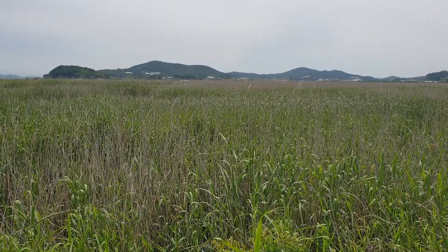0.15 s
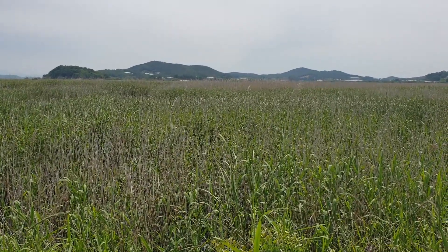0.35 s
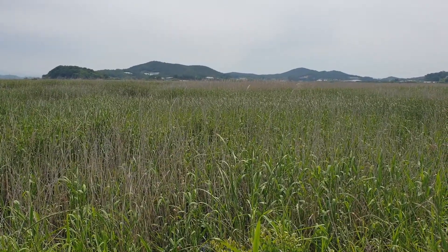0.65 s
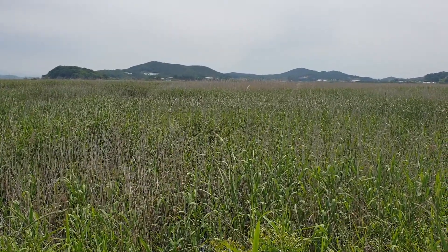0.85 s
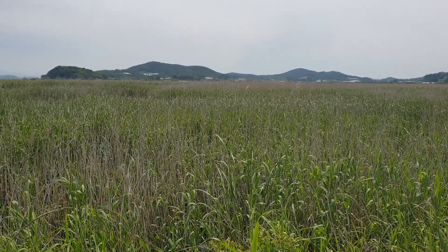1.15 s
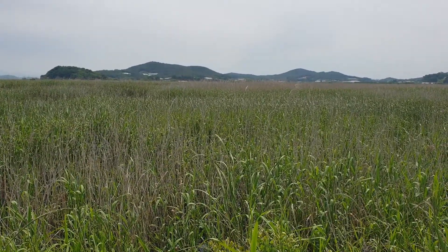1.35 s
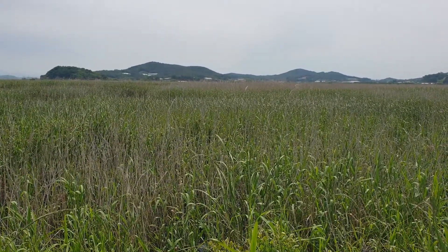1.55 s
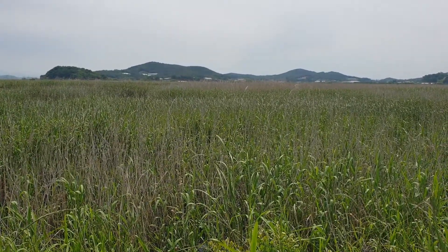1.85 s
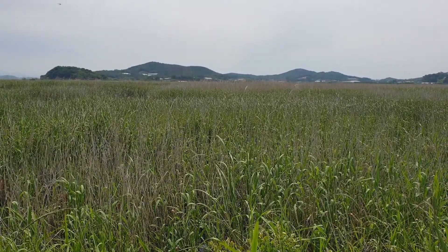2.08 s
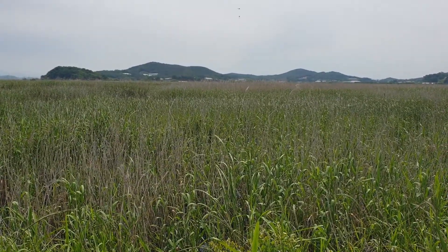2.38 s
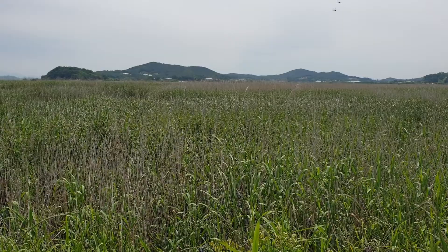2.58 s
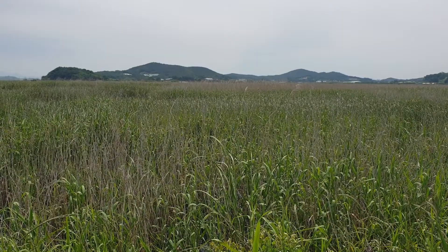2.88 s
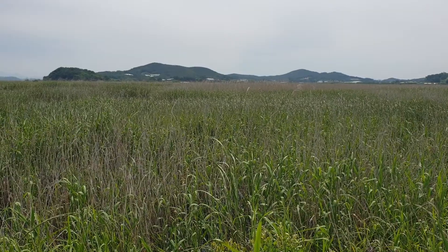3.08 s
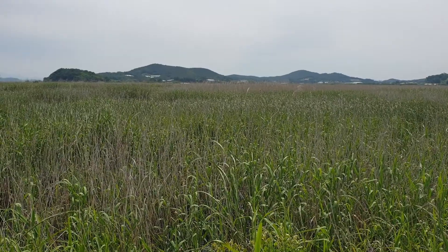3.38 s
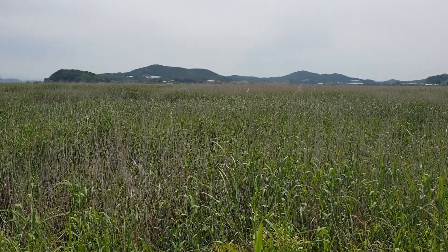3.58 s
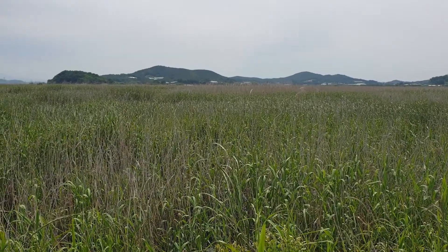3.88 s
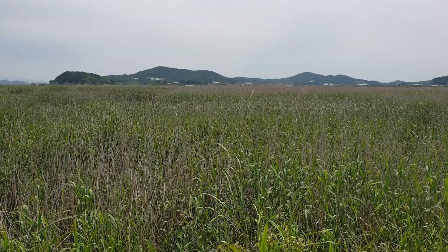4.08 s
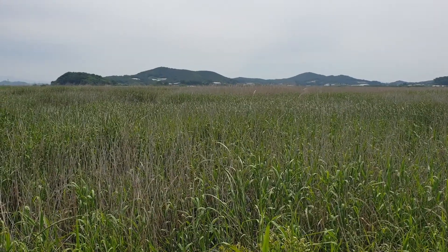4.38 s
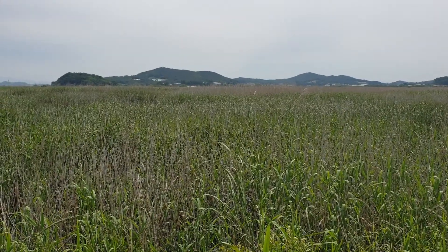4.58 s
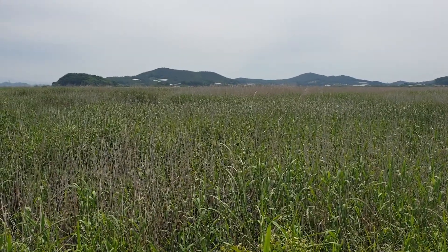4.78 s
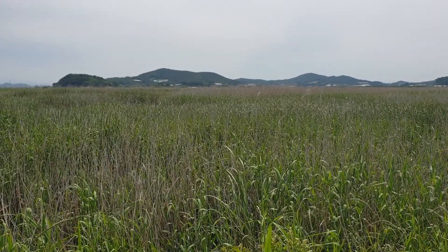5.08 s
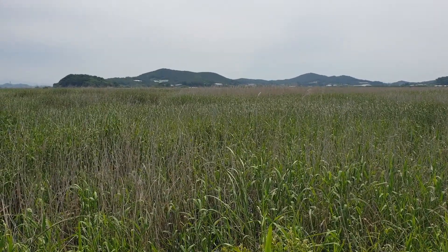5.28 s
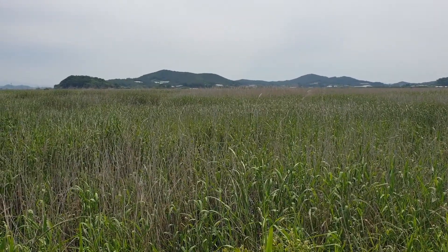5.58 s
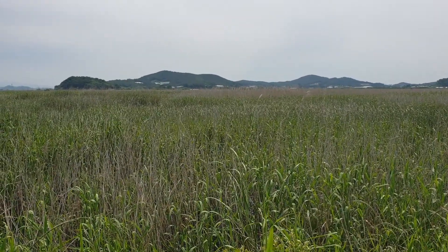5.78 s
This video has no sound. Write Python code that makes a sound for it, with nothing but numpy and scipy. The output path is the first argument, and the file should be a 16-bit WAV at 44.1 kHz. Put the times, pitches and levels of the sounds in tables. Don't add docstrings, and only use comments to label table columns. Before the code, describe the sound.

Open reed marsh in stereo. Low wind moan and a far propeller plane's rumbling hum run throughout. Small croaks and a rising warble open, then a water bird gives loud nasal honks in pairs, short falling then held, about every 1.3 seconds. Four dry rasps come early; later thin arched whistles repeat, leaning right. Stems scatter short, sparse echoes.

```python
import sys
import numpy as np
from scipy import signal
from scipy.fft import rfft, irfft, next_fast_len
from scipy.io import wavfile
from scipy.ndimage import uniform_filter1d

SR = 44100
rng = np.random.default_rng(int(sys.argv[2]) if len(sys.argv) > 2 else 0)


def put_to_file(sound):
    columns = np.atleast_2d(sound).T
    safe = np.clip(columns, -1, 1)
    whole_steps = np.round(safe * 32767)
    wavfile.write(sys.argv[1], SR, whole_steps.astype(np.int16))


def ratio(d):
    e = np.asarray(d, float) / 20
    return 10 ** e


N = 261954
T = np.arange(N) / SR


def evened(x):
    return x / np.sqrt(np.mean(x ** 2) + 1e-20)


def read(points, hz):
    f, value = np.transpose(points)
    return np.interp(np.log(hz + 1), np.log(f + 1), value)


def curve(rows, t=T):
    s, *columns = np.transpose(rows)
    return [np.interp(t, s, c) for c in columns]


def add(mix, s, sound):
    part = mix[round(s * SR):][:len(sound)]
    part += sound[:len(part)]


def drift(size):
    return evened(uniform_filter1d(uniform_filter1d(rng.standard_normal(N), size), size))


def bouts(rows):
    return np.max([db * np.exp(-((T - s) / half_s) ** 2) for s, half_s, db in rows], axis=0)


def sine(hz):
    return np.sin(2 * np.pi * np.cumsum(hz) / SR)


def resonate(x, hz, width_hz):
    turn = np.exp(2j * np.pi * np.cumsum(hz * np.ones(len(x))) / SR)
    r = np.exp(-np.pi * width_hz / SR)
    return 2 * (turn * signal.lfilter([(1 - r) ** 2], [1, -2 * r, r * r], x / turn + 1e-18)).real


def resonate_twice(x, hz, width_hz):
    return resonate(resonate(x, hz, width_hz), hz, width_hz)


def noise(spectrum, same, patchy_db, size=2048):
    hz = np.fft.rfftfreq(size, 1 / SR)
    a, b, c, d, patches = rng.standard_normal((4 * N // size + 5, len(hz), 5), dtype=np.float32).T
    patches = evened(uniform_filter1d(uniform_filter1d(patches, size=8, axis=0), size=10, axis=1))
    same = np.clip(read(same, hz), -1, 1)[:, None]
    left = a + 1j * b
    right = same * left + np.sqrt(1 - same ** 2) * (c + 1j * d)
    z = np.array([left, right]) * ratio(read(spectrum, hz)[:, None] + patchy_db * patches)
    return evened(signal.istft(z, nperseg=size, noverlap=size * 3 // 4)[1][:, :N])


def place(x, lean_db, lag_us=0.):
    left = x
    if lag_us:
        size = next_fast_len(N + 4096)
        turn = np.minimum(2 * np.pi * np.fft.rfftfreq(size, 1 / SR) * lag_us * 1e-6, 1.1)
        left = irfft(rfft(x, size) * np.exp(-1j * turn), size)[:N]
    return np.array([left * ratio(lean_db / 2), x * ratio(-lean_db / 2)])


def ports(x, table):
    size = next_fast_len(N + 9000)
    x = np.pad(np.atleast_2d(x), [(0, 0), (4096, 4096)], "reflect")
    hz, rows = np.fft.rfftfreq(size, 1 / SR), np.array(table)
    half = ratio(read(rows[:, :2], hz) / 2) * np.exp(.5j * read(rows[:, ::2], hz))
    return irfft(rfft(x, size) * np.array([half, 1 / half]), size)[:, 4096:][:, :N]


# f/Hz, t60/s
ECHO_DECAY = [(500, 0.27), (900, 0.14), (1700, 0.32), (2600, 0.46), (3500, 0.33), (4500, 0.36),
              (7000, 0.43), (11000, 0.14)]


def scatter(x):
    taps = np.zeros((2, SR))
    at = np.arange(200, SR - 20, 20) + rng.integers(0, 20, (2, (SR - 201) // 20))
    np.put_along_axis(taps, at, rng.choice([-1., 1.], at.shape), 1)
    hz, t, z = signal.stft(taps, SR, nperseg=256)
    tail = signal.istft(z * ratio(-60 * t / read(ECHO_DECAY, hz)[:, None]), SR, nperseg=256)[1]
    return signal.fftconvolve(x, tail / np.linalg.norm(tail[0]), axes=1)[:, :N]


# f/Hz, level/dB per Hz
HISS = [(500, -23), (750, -5), (1140, -7), (2170, -10.5), (2600, -7), (4400, -13.5), (5100, -14),
        (6640, -12.5), (8310, -30), (9300, -23), (11200, -12), (15000, -14.5), (15700, -15), (15900, -56)]
# f/Hz, level/dB per Hz
CHORUS = [(2500, -40), (3400, -7), (4600, -5), (5200, -10), (6000, -2), (7000, 0), (7800, -3), (8200, -40)]
# f/Hz, level/dB per Hz
RUSTLE = [(8000, -30), (9000, -1), (10000, 0), (11000, -6), (13000, -9), (15700, -13), (15900, -60)]
# centre t/s, half length/s, rise/dB
CHORUS_BOUTS = [
    (0, 0.12, 12.5),
    (1, 0.44, 2),
    (2.27, 0.22, 7),
    (2.8, 0.24, 18),
    (3.15, 0.76, 13),
    (4.2, .8, 8.5),
    (4.9, 0.63, 14),
    (5.75, .4, 17),
]
# centre t/s, half length/s, rise/dB
RUSTLE_BOUTS = [
    (2.25, 0.18, 8.4),
    (2.95, 0.26, 5.6),
    (4.25, 0.45, 6),
    (5.7, 0.77, 13.4),
]


def reeds():
    apart = [(100, 0), (16000, 0)]
    hiss = noise(HISS, apart, patchy_db=.6, size=512)
    chorus = noise(CHORUS, apart, patchy_db=2.2, size=512) * ratio(np.c_[-2, 2].T)
    rustle = noise(RUSTLE, apart, patchy_db=1.2, size=512) * ratio(np.c_[-1.5, 1.5].T)
    chorus_db = -92.5 + bouts(CHORUS_BOUTS)
    rustle_db = -91 + bouts(RUSTLE_BOUTS)
    return ratio(-76.5) * hiss + ratio(chorus_db) * chorus + ratio(rustle_db) * rustle


# t/s, strength/dB, moan gustiness/dB
WIND = [(0, 0, 4), (.38, -3, 0), (.74, -6, 12.5), (1.09, 2, -7.5), (1.28, 6, -1), (1.6, 1.5, 4.5),
        (2.1, 1.5, 0), (2.5, -2.5, 4.5), (2.85, 6.5, -2), (3.2, 3.5, 2), (3.4, 2.5, -3.5), (4.05, 1.5, 3.5),
        (4.4, -9, 3.5), (5.2, -9.5, 2), (5.6, -6.5, 2), (5.94, -3.5, -1.5)]
# f/Hz, likeness/1
LIKENESS = [(30, 1), (60, 0.91), (130, 1), (290, 0.88), (640, 0.9), (1300, 0.43)]


def wind():
    strength_db, gust_db = curve(WIND)
    moan_hz_db = [(280, -54.0), (340, -0.5), (420, 2.5), (480, -3.0), (560, -19.0), (700, -58.0)]
    edge_hz_db = [(450, -19.0), (560, -0.5), (700, 1.0), (800, -10.0), (1000, -20.0), (1400, -42.5)]
    moan = noise(moan_hz_db, LIKENESS, patchy_db=2.0)
    edge = noise(edge_hz_db, LIKENESS, patchy_db=3.0)
    return ratio(strength_db) * (ratio(-57.5 + gust_db) * moan + ratio(-70.5) * edge)


# t/s, blade rate/Hz, blade level/dB, octave level/dB, boom swell/dB
PLANE = [(0, 109.6, -57, -56.5, 0.5), (.5, 109.2, -50, -50.5, 1.8), (.75, 109.7, -53.5, -60, -1.5),
         (1.1, 110, -42, -54, 0.5), (1.5, 110.1, -62.5, -47.5, -2.5), (1.75, 110.3, -45.5, -56, -1),
         (2.15, 109.4, -49, -49.5, -0.5), (2.5, 108.8, -45.5, -53, -0.5), (2.75, 107.9, -41, -54.5, -0.2),
         (3.9, 108.1, -32, -50.5, 2), (4.2, 108.5, -35.5, -48.5, 0.3), (4.45, 109.1, -52, -46.5, -1.5),
         (4.75, 107.5, -43, -50, -3.5), (5, 107.1, -52.5, -56, 0.5), (5.2, 106.1, -35, -50, 1),
         (5.4, 106.9, -49.5, -52, 0.5), (5.94, 106.7, -47.5, -52, 1.4)]
# f/Hz, level/dB per Hz
BOOM = [(18, -33), (30, -31), (42, 15), (54, 12), (62, 18.5), (70, 16), (85, 9), (100, 12), (130, -8.5),
        (170, -52)]
# f/Hz, level/dB per Hz
ROAR = [(80, -48), (115, 1.5), (160, 2), (215, 2.5), (270, -4), (320, -18), (400, -74.5)]


def aircraft():
    blade_hz, blade_db, octave_db, boom_db = curve(PLANE)
    turn = 2 * np.pi * np.cumsum(blade_hz + 0.608 * drift(size=4000)) / SR
    first = ratio(blade_db + 3.5) * np.sin(turn)
    fading = ratio(octave_db + 2 * drift(size=5000))
    tones = first + fading * (np.sin(2 * turn) + ratio(-14.0) * np.sin(3 * turn))
    roar = ratio(-44 + 0.69 * curve(WIND)[0]) * noise(ROAR, LIKENESS, patchy_db=2.5)
    boom = ratio(-38.5 + boom_db) * noise(BOOM, LIKENESS, patchy_db=2.0, size=8192)
    return boom + roar + tones


# t/s, level/dB, f/Hz
TICKS = [(.001, -60, 1800), (.02, -66, 7000), (.162, -50, 900), (.163, -66, 4500), (1.221, -62, 1100),
         (1.218, -70, 7000), (2.212, -69, 12000), (2.261, -67, 11000), (2.267, -69, 11500),
         (2.278, -67, 11500), (2.874, -71, 7000), (5.47, -74, 12000)]


def stems():
    out, t = np.zeros(N), np.arange(300) / SR
    for s, db, hz in TICKS:
        snap = evened(resonate(rng.standard_normal(len(t)), hz, .8 * hz))
        add(out, s, ratio(db - 2) * snap * np.exp(-t / .0016))
    return out


# t/s, length/s, first f/Hz, last f/Hz, level/dB
SWEEPS = [(.008, 0.016, 2420, 2430, -77), (0.023, 0.026, 2420, 2450, -80), (1.415, 0.049, 2670, 3300, -86),
          (1.546, 0.017, 2920, 3700, -89), (1.577, .022, 3940, 2820, -89), (1.669, .02, 2650, 3450, -86),
          (1.794, 0.012, 2940, 3350, -84), (1.813, .014, 3270, 3150, -85), (1.821, .012, 3400, 2700, -86),
          (2.579, 0.021, 2700, 4000, -86), (2.803, 0.024, 2730, 3800, -93), (2.876, .022, 3920, 2750, -84),
          (5.278, 0.029, 2820, 3300, -92), (5.35, .04, 1514, 1410, -84.5), (5.359, .018, 3150, 3050, -85),
          (5.514, 0.029, 2870, 3770, -88)]


def sweeps():
    out = np.zeros(N)
    for s, length_s, first_hz, last_hz, db in SWEEPS:
        hz = np.linspace(first_hz, last_hz, round(length_s * SR))
        add(out, s, ratio(db + 10.0) * np.hanning(len(hz)) ** .5 * sine(hz))
    return out


def pulsed(rows, per_s, quicken, duty, lift, click_width_hz, ring_width_hz, rough):
    out = np.zeros(N)
    for s, length_s, first_hz, last_hz, first_db, last_db in rows:
        u = np.arange(0, length_s, 1 / SR) / length_s
        uneven = 1 + .25 * evened(uniform_filter1d(rng.standard_normal(len(u)), size=300))
        phase = np.cumsum(per_s * (1 + quicken * u) * uneven) / SR % 1
        puffs = .1 + .35 * u + np.exp(-((phase - duty) / duty) ** 2 * 2)
        air = puffs * rng.standard_normal(len(u))
        hz = first_hz + (last_hz - first_hz) * u ** 2.0
        click = evened(resonate_twice(air, lift * hz, click_width_hz))
        breath = evened(resonate_twice(air, hz, ring_width_hz))
        tone = evened(puffs * sine(hz))
        ring = rough * breath + (1 - rough) * tone
        sound = evened((1 - u ** 1.5) * click + (.3 + 1.3 * u) * ring)
        level = ratio(first_db + (last_db - first_db) * u)
        add(out, s, level * sound * signal.windows.tukey(len(u), 0.22))
    return out


# t/s, f/Hz, level/dB
BUZZES = [
    (2.558, 7000, -84.5),
    (2.635, 6940, -79.5),
    (2.736, 7160, -76.5),
    (2.85, 7400, -79),
    (2.959, 7330, -82),
    (3.079, 7660, -89.5),
]


def buzzer():
    length_s, sag, swell_db = .033, 0.93, 6
    rows = np.array([(s, length_s, hz, sag * hz, db, db + swell_db) for s, hz, db in BUZZES])
    lower = rows * np.array([1, 1, .53, .53, 1, 1])
    high_voice = pulsed(rows, per_s=170, quicken=.1, duty=.4, lift=1,
                        click_width_hz=1800, ring_width_hz=1300, rough=.8)
    low_voice = pulsed(lower, per_s=170, quicken=.1, duty=.4, lift=1,
                       click_width_hz=1200, ring_width_hz=600, rough=.9)
    return high_voice + ratio(-5) * low_voice


# t/s, length/s, first f/Hz, last f/Hz, level/dB
CROAKS = [(0.033, 0.052, 1600, 1750, -71), (0.068, 0.038, 2050, 2720, -67.5),
          (0.08, 0.044, 3100, 3600, -78), (.078, .025, 1500, 1400, -78), (0.165, 0.048, 1580, 1900, -72),
          (0.201, 0.029, 2260, 2820, -66.5), (0.204, 0.048, 3180, 3600, -79),
          (0.208, 0.022, 1600, 1490, -78), (0.246, 0.019, 2550, 2770, -83),
          (0.522, 0.067, 1900, 1890, -82.5), (1.27, .04, 9700, 9360, -81), (1.562, 0.04, 2670, 2650, -81),
          (2.58, 0.013, 3500, 3400, -84), (2.712, 0.017, 2800, 2750, -80), (2.758, .01, 5530, 5500, -77),
          (2.906, 0.016, 5390, 5588, -74), (3.136, 0.018, 2960, 2910, -93),
          (4.106, 0.0093, 1526, 1546, -75), (4.865, 0.028, 1637, 1599, -79), (5.21, 0.016, 3150, 3100, -80),
          (5.602, 0.079, 4000, 3828, -75.5), (5.751, 0.034, 2100, 2448, -73.5),
          (5.776, 0.033, 2520, 2577, -79), (5.654, .03, 3700, 4300, -81)]


def croaker():
    rows = [(*row, row[-1]) for row in CROAKS]
    return pulsed(rows, per_s=85, quicken=.3, duty=.36, lift=1.05,
                  click_width_hz=750, ring_width_hz=1500, rough=.82)


# t/s, f/Hz, level/dB, wobble depth/Hz
WARBLE = [
    (.283, 5200, -72, 99),
    (.292, 5750, -58.5, 150),
    (.305, 6200, -53, 170),
    (.33, 6070, -56, 220),
    (.342, 6530, -52, 130),
    (.363, 6650, -50.5, 90),
    (.374, 7000, -68, 70),
    (.382, 6950, -75, 40),
]


def warbler():
    hz, db, depth_hz = curve(WARBLE)
    wobble = np.sin(2 * np.pi * 103 * (T - .3005))
    on = (T > WARBLE[0][0]) & (T < WARBLE[-1][0])
    return on * ratio(db - 2.0 * depth_hz / 300 * wobble) * sine(hz + depth_hz * wobble)


# t/s, length/s, last f/Hz, level/dB, swell/dB
RASPS = [
    (.571, .12, 2530, -64.5, 6.5),
    (0.786, 0.1, 2420, -61, 1),
    (0.994, 0.115, 2320, -63, 3.5),
    (1.217, 0.11, 2470, -63.5, 2.5),
]


def rasper():
    out, start_hz = np.zeros(N), 3700
    for s, length_s, last_hz, db, swell_db in RASPS:
        t = np.arange(0, length_s, 1 / SR)
        u = t / length_s
        phase = 63 * t * (1 + 3 * t) % 1
        weak_second = ratio(-5 * np.exp(-((t - .018) / .007) ** 2))
        beats = np.minimum(phase / .05, 1) * np.exp(-(phase / .42) ** 2) * weak_second
        air = (.1 + .4 * u ** 2 + beats) * rng.standard_normal(len(t))
        hz = start_hz + (last_hz - start_hz) * u ** 2.44
        scrape = evened(resonate_twice(air, 5200 - 1000 * u, 2200)) * ratio(-1.0 - 9 * u)
        ring = evened(resonate(resonate(air, hz, 1700), hz, 1600))
        ring *= ratio(-3 + 5.0 * np.minimum(u / 0.5, 1))
        add(out, s, ratio(db + swell_db * u) * (scrape + ring) * np.minimum((1 - u) / .06, 1))
    return out


# apex t/s, top f/Hz, flat half length/s, level/dB, rising limb/dB
ARCHES = [(1.575, 4700, 0.0062, -73, -12), (1.711, 4590, 0.013, -69, -19), (1.971, 4702, 0.013, -66.5, 6),
          (2.225, 4770, 0.013, -61.5, -21), (2.441, 4680, 0.0088, -64, -21),
          (2.639, 5090, 0.011, -60.5, -9), (2.851, 5210, 0.0048, -59, -19), (3.049, 5177, 0.012, -60, -12),
          (3.283, 4640, 0.0094, -66.5, -19), (3.567, 5050, 0.0021, -64.5, -22),
          (3.847, 4397, 0.003, -69.5, -28), (5.07, 4520, 0.0055, -66.5, -27), (5.177, 4580, .008, -80, 10),
          (5.321, 4940, 0.009, -62.5, -25), (5.412, 4800, 0.0032, -68, -8), (5.483, 4300, 0.0099, -72, -15),
          (5.567, 4820, 0.012, -60.5, -22), (5.821, 4800, 0.02, -61.5, -22)]
# f/Hz, gain/dB
BEAK = [(2600, -17.5), (3300, -17), (3750, -5.5), (4100, -12), (4500, 0.5), (4750, -3), (5000, -5.5),
        (5300, -16.5)]


def whistler():
    out, t = np.zeros(N), np.arange(-2600, 2200) / SR
    for s, top_hz, flat_s, db, rise_db in ARCHES:
        limb = np.maximum(abs(t) - flat_s, 0) * np.where(t > 0, 1.08, .95)
        hz = top_hz - 62000 * uniform_filter1d(limb, size=400) - 4000 * t
        corners_s = [-flat_s - .009, -flat_s + 0.0028, flat_s + 0.011, flat_s + 0.037]
        swell_db = np.interp(t, corners_s, [rise_db, -3, 0, -10])
        ends = np.clip((hz - np.where(t < 0, 3500, 3000)) / 500, 0, 1)
        add(out, s + t[0], ratio(db + swell_db + read(BEAK, abs(hz))) * ends * sine(hz))
    return out * ratio(3.3 * drift(size=120))


# t/s, second partial f/Hz, level/dB, bill opening as third partial/dB, mouth f/Hz
SHORT = [
    [(0.62, 1708, -53.5, 2.5, 3950), (0.648, 1733, -42.5, 5, 3950), (0.67, 1690, -42.5, 4, 3600),
     (0.688, 1663, -40.5, 0, 3700), (0.73, 1490, -49, -10, 3200), (0.745, 1430, -53.5, -12, 3240)],
    [(4.165, 1685, -54.5, -4.5, 3640), (4.195, 1737, -46.5, 4, 3820), (4.225, 1705, -46, 0, 3550),
     (4.26, 1625, -47, -6.5, 3220), (4.295, 1546, -54, -10, 3074), (4.308, 1485, -54, -19, 2973)],
    [(5.873, 1768, -57, 0, 3720), (5.897, 1780, -46, 1.5, 3950), (5.94, 1697, -44.5, 3.5, 3680)],
]
BROKEN = [
    [(1.851, 1797, -64, 0, 4000), (1.868, 1868, -54.5, 2.5, 3950), (1.884, 1824, -53, 5.5, 3930),
     (1.892, 1696, -47, 0.5, 3940), (1.915, 1707, -49.5, 2.5, 3850), (1.925, 1775, -48.5, 4.5, 3770),
     (1.978, 1588, -53.5, -11.5, 3580), (1.99, 1495, -59, -43, 3410)],
    [(3.306, 1755, -59.5, -6, 3700), (3.326, 1812, -52, -2, 3700), (3.338, 1691, -49, -2.5, 4060),
     (3.366, 1692, -47, -2, 4120), (3.378, 1767, -50.5, -0.5, 4020), (3.4, 1709, -48, -3, 3900),
     (3.444, 1580, -55, -15, 3550), (3.456, 1557, -58.5, -21.5, 3500)],
]
LONG = [
    [(0.871, 1562, -61, -5, 3300), (0.891, 1580, -50.5, -3.5, 3400), (0.933, 1546, -49, -8, 3600),
     (1.0, 1566, -48.5, -8.5, 3440), (1.06, 1577, -47.5, -6, 3340), (1.113, 1588, -48, -3.5, 3290),
     (1.129, 1572, -49, -15, 3300), (1.15, 1501, -54, -9, 3260)],
    [(2.064, 1585, -63, -28, 2900), (2.118, 1660, -55.5, -10.5, 2900), (2.15, 1665, -54.5, -12.5, 2840),
     (2.218, 1728, -53.5, -7.5, 3310), (2.274, 1717, -51.5, -17.5, 3480), (2.332, 1732, -53, -11, 3430),
     (2.356, 1686, -49.5, -15.5, 3408), (2.398, 1702, -49.5, -21, 3356), (2.415, 1602, -59, -18, 3269)],
    [(3.478, 1566, -57, -31, 2960), (3.514, 1710, -52, -11.5, 3200), (3.554, 1724, -50.5, -5, 4149),
     (3.61, 1712, -50, -3, 3700), (3.632, 1669, -47.5, -8, 3770), (3.686, 1657, -46.5, -5.5, 4230),
     (3.744, 1661, -45.5, -6, 3925), (3.768, 1618, -47, -9, 3580), (3.786, 1542, -58, -19.5, 3400)],
    [(4.31, 1511, -55.5, -11, 3000), (4.35, 1557, -51, -9, 3100), (4.378, 1554, -49.5, -6.5, 4730),
     (4.41, 1563, -48, -7.5, 4500), (4.438, 1579, -46.5, -8.5, 4050), (4.5, 1617, -45.5, -4.5, 3620),
     (4.528, 1621, -47, -7, 3980), (4.55, 1603, -47, -9.5, 3130), (4.568, 1494, -64, -10, 3092)],
]
NASAL_DB = [-2, -3, 0.5, -0.5, 0.5, -0.5, 2.5, 2, -1]
# f/Hz, gain/dB
THROAT = [(3000, -10), (3500, -18.5), (4350, -18.5), (4800, -30), (5200, -29.5), (6100, -41.5), (7000, -48),
          (7800, -30), (8700, -56.5), (9500, -34.5), (10500, -50)]


def water_bird():
    onset_s, release_s = 0.0045, 0.012
    honks = sorted(SHORT + BROKEN + LONG)
    second_hz, level_db, bill_db, mouth_hz = curve(sum(honks, []))
    gates = [np.clip(np.minimum((T - h[0][0]) / onset_s, 1 + (h[-1][0] - T) / release_s), 0, 1)
             for h in honks]
    gate = np.minimum(sum(gates), 1)
    hz = uniform_filter1d(second_hz, size=150) / 2 * (1 + 0.0023 * drift(size=150))
    turn = 2 * np.pi * np.cumsum(hz) / SR

    above_throat_hz = second_hz - 1670
    second_db = np.dot(NASAL_DB, gates) + 0.0425 * above_throat_hz + 0.081 * bill_db
    upper_db = -3 + 0.98 * bill_db + 0.0335 * above_throat_hz
    stretch = 0.96 + .004 * bill_db
    mouth_width_hz = 750 * ratio(0.54 * bill_db)
    partials_db = [0 * hz, second_db, bill_db]
    for k in range(4, 13):
        throat_db = upper_db * (1 + .12 * (k - 4)) + read(THROAT, k * hz / stretch)
        mouth_db = 13 * np.exp(-((k * hz - mouth_hz) / mouth_width_hz) ** 2)
        partials_db.append(throat_db + mouth_db)

    air = ratio(-26.5) * drift(size=80)
    out = np.zeros(N)
    for k, db in enumerate(partials_db):
        flicker_db = (.5 + .1 * min(k, 4) ** 2) * drift(size=700)
        out += ratio(db + flicker_db) * (1 + air) * np.cos((k + 1) * turn)
    bill_air = evened(resonate(rng.standard_normal(N), 6000, 5000))
    mouth_air = evened(resonate(rng.standard_normal(N), mouth_hz, 1100))
    out += ratio(upper_db - 35) * bill_air + ratio(-28.5 + 0.5 * bill_db) * mouth_air
    return -np.sqrt(2) * ratio(level_db) * gate ** 2 * out


# f/Hz, left minus right/dB, left lead/rad
HONK_PORTS = [(850, 2, -0.073), (1700, 2, -0.46), (2550, 0, -1.2), (3400, 1, -1.2), (4300, -2, -1.6),
              (7000, -8.5, -1.2)]
ARCH_PORTS = [(3300, -8, 2.7), (4300, -17, 0.97), (5500, -11, .5)]
LOW_PORTS = [(29.6, -1.5, 0.9), (60, -4.5, 0.34), (110, -1, 0.58), (194, -2, 0), (300, -1, 0),
             (500, 1, -1.11), (804, -3, -1.8)]


def scene():
    honks, arches, warble = water_bird(), whistler(), warbler()
    rasps, croaks, buzzes, ticks = rasper(), croaker(), buzzer(), stems()
    near = ports(honks, HONK_PORTS) + ports(arches, ARCH_PORTS)
    near += place(warble, -1.9, lag_us=22) + place(rasps, -0.81, lag_us=30)
    near += place(croaks, .5) + place(buzzes, -14.0) + place(ticks, .5) + place(sweeps(), -8)
    wet = ratio(-17) * honks + ratio(-13.0) * warble + ratio(-7.0) * rasps + ratio(-5.5) * croaks + ticks
    haze = ratio(1.5) * resonate(arches * drift(size=40), 3700, 1900) + ratio(-4.5) * buzzes
    wet = wet + haze * ratio(np.c_[-3, 1.5].T)
    return near + scatter(wet) + ports(aircraft() + wind(), LOW_PORTS) + reeds()


def top_cut(x):
    return signal.sosfilt(signal.butter(12, 15750, fs=SR, output="sos"), x)


def record(dry):
    mix = dry * np.minimum(T / 0.0018, 1)
    return top_cut(mix)


dry = scene()
out = record(dry)
put_to_file(out)
```